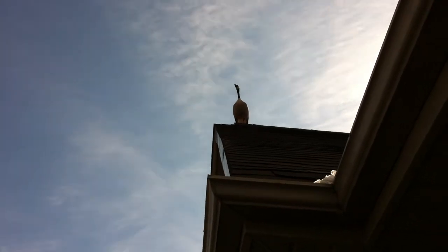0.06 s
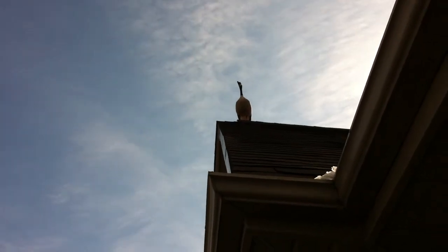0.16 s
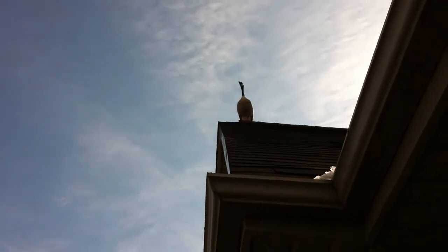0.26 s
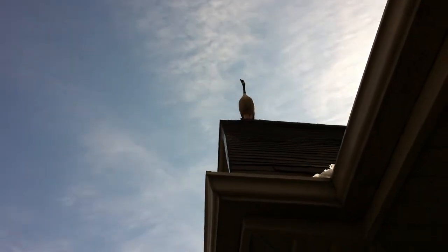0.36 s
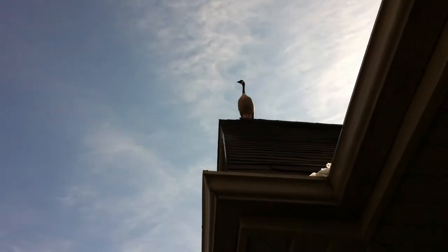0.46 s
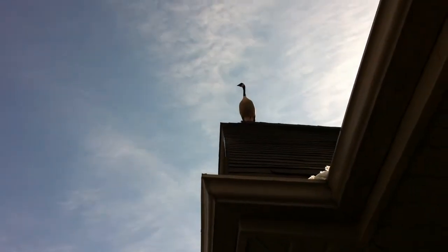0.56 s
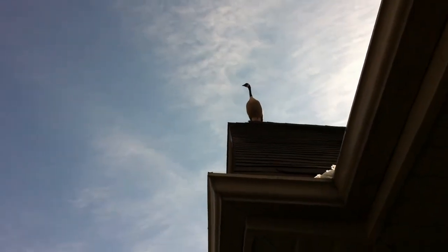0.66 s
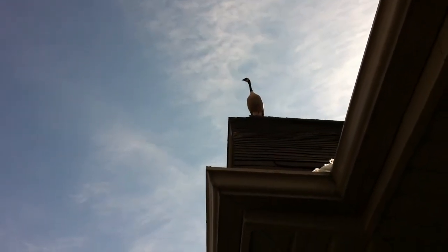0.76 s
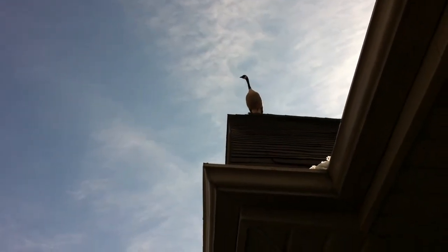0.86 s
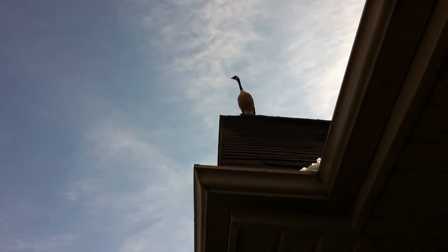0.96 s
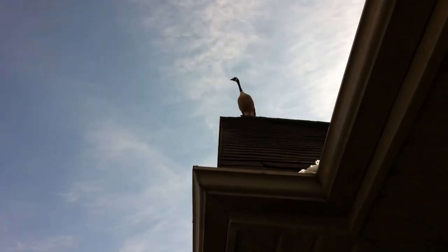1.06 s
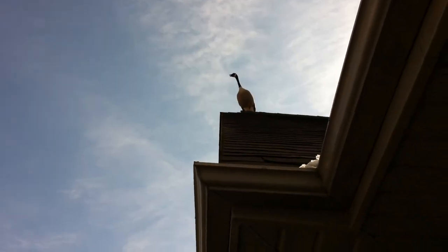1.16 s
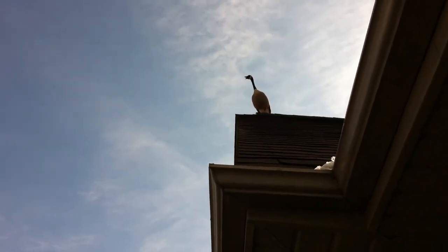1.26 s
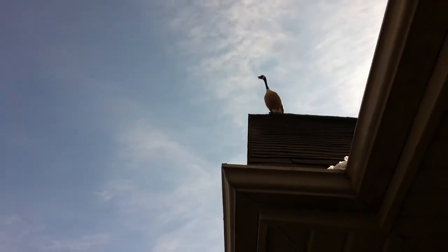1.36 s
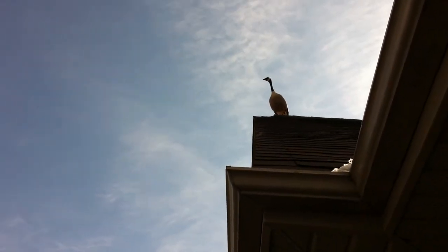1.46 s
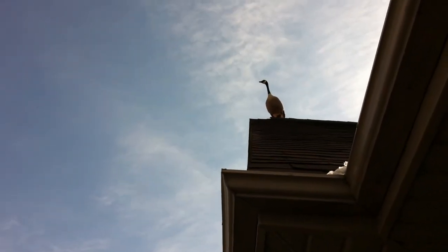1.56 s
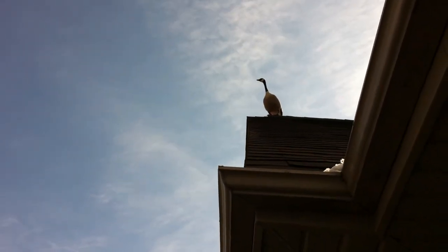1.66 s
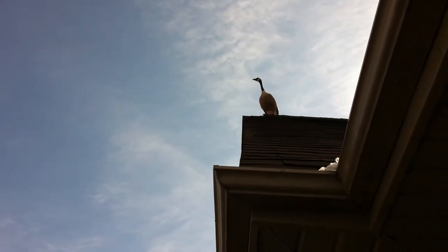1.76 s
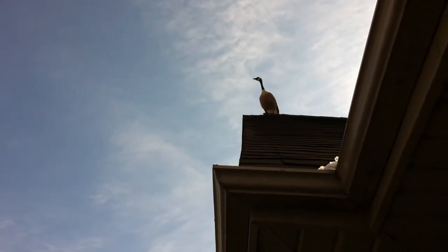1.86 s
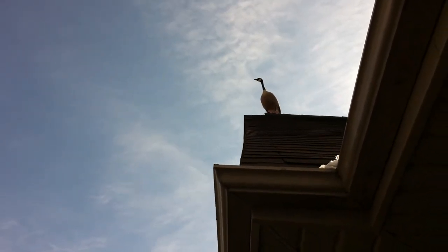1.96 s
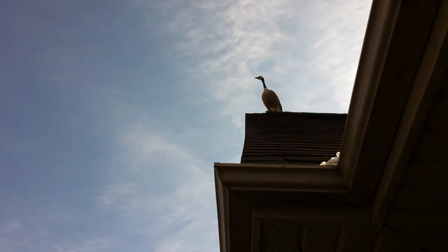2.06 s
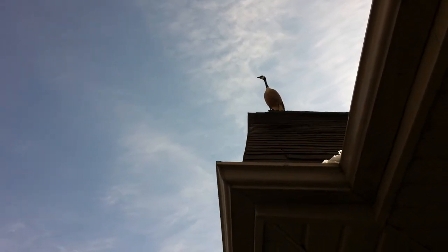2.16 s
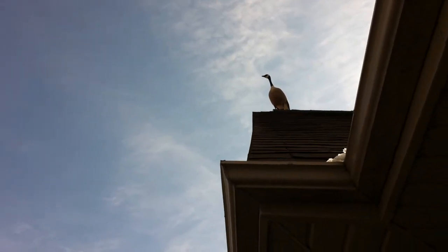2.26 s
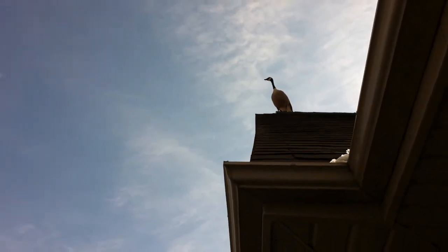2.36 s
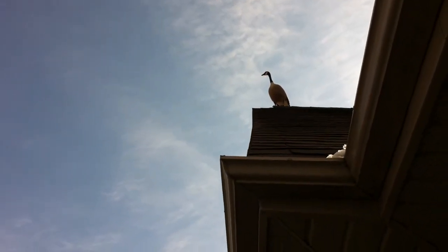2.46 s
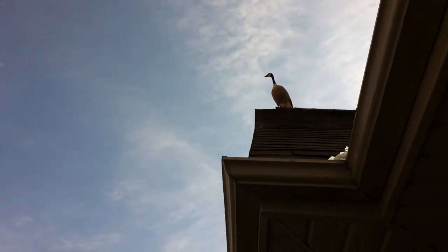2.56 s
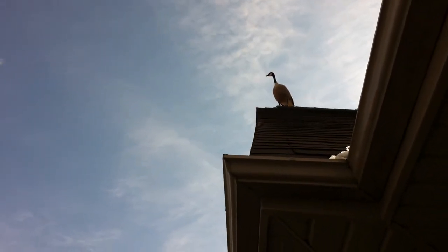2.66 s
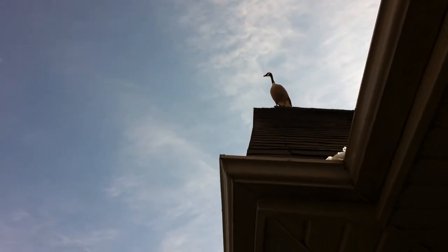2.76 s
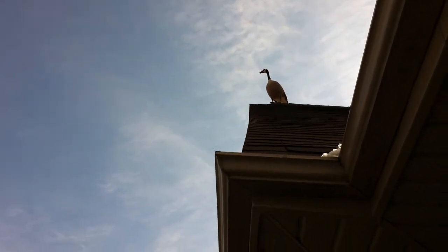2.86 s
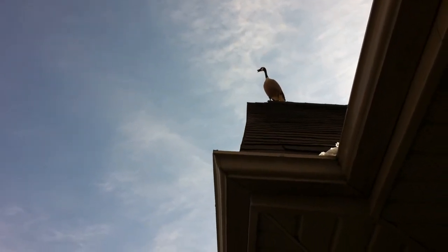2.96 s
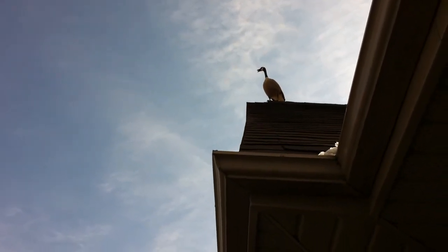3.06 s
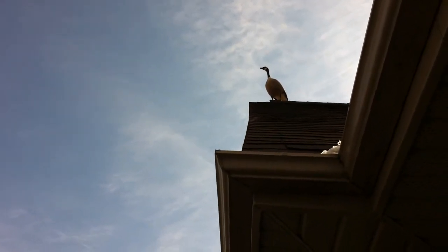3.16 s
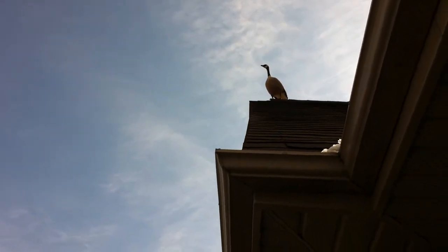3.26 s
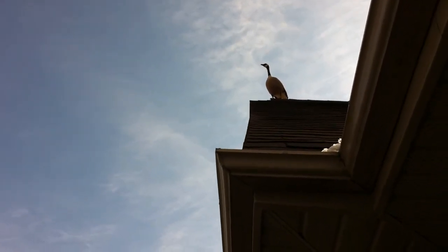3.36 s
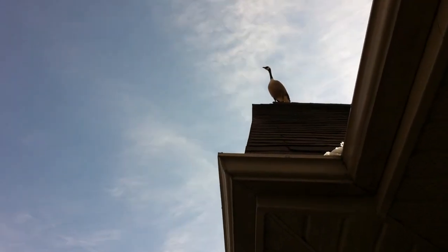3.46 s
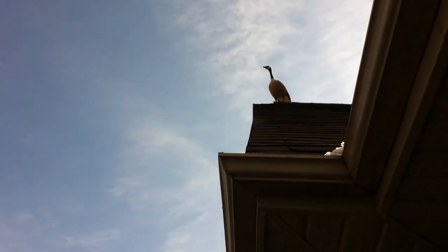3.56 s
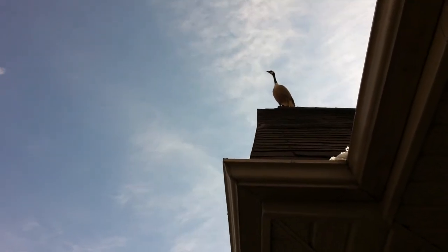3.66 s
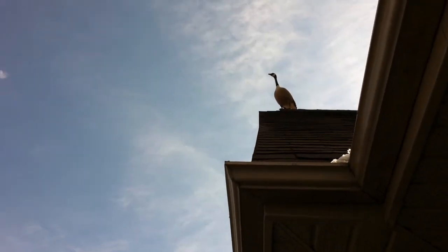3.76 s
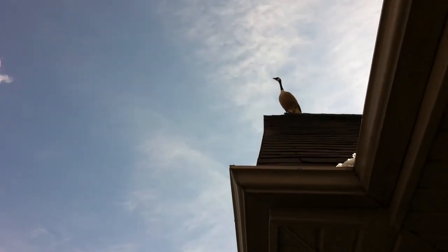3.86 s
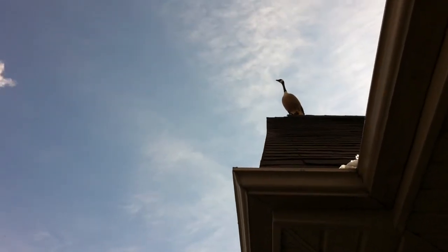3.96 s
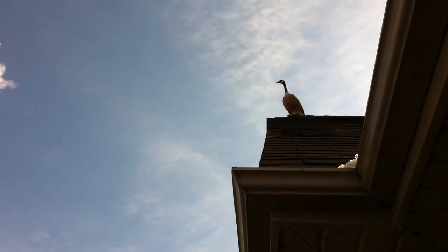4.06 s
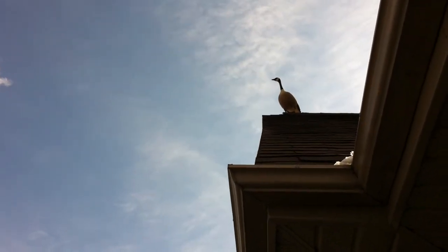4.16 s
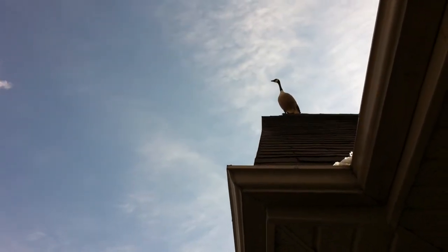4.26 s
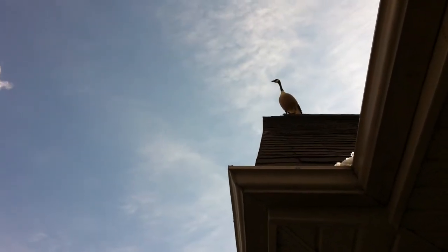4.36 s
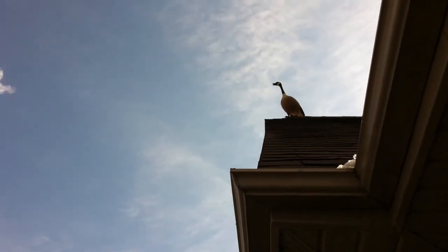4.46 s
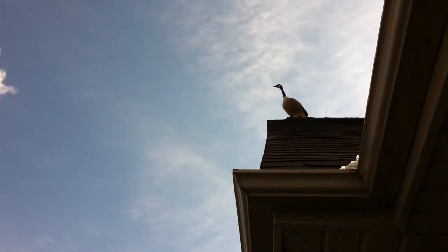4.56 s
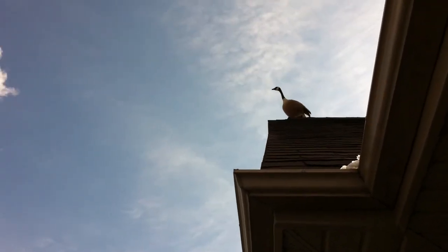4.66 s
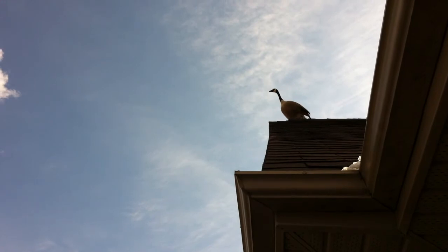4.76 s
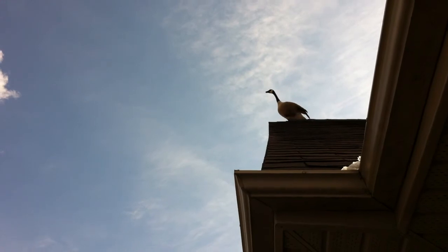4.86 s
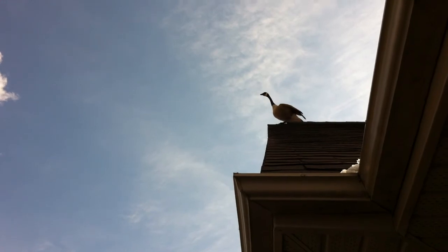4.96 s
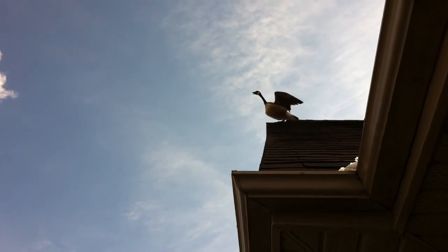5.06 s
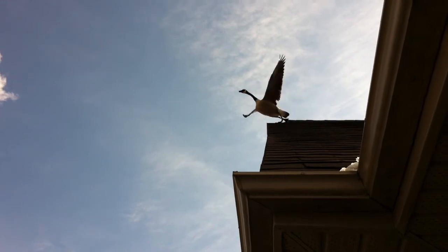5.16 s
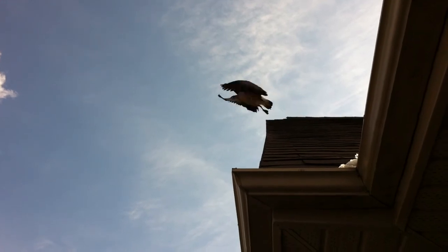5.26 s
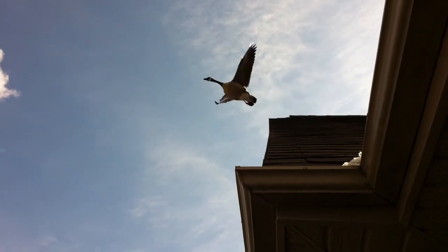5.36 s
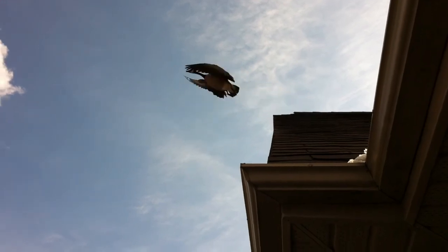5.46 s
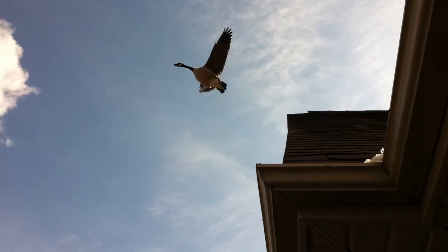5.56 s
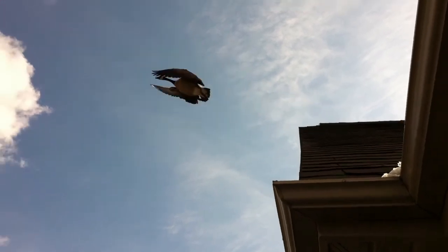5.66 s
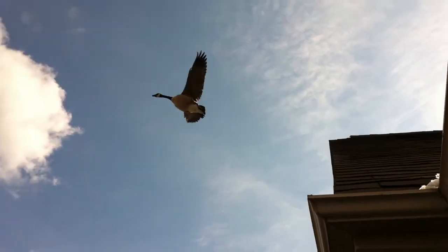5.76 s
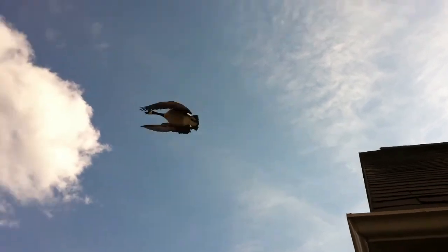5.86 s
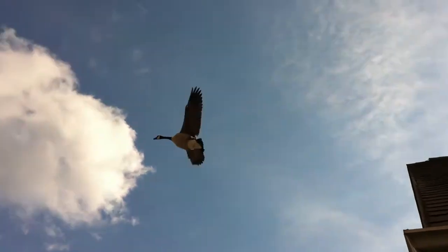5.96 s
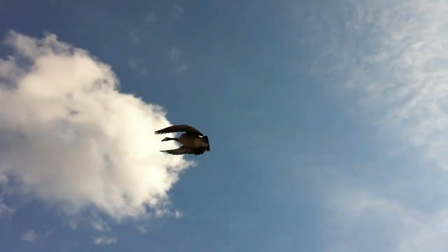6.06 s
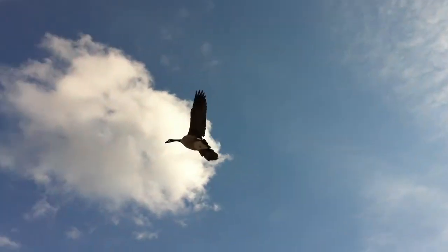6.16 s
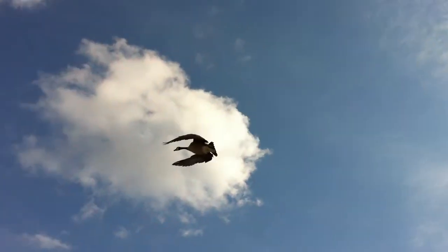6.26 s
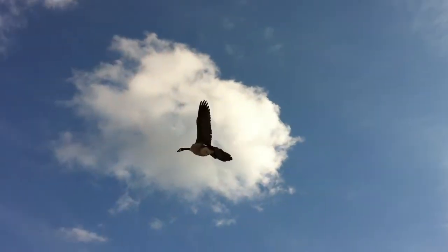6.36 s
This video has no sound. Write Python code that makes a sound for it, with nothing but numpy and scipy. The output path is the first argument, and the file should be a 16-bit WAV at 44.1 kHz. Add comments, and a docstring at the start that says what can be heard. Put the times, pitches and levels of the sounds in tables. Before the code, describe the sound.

A goose on a rooftop gives three loud, well-spaced honks, each a low grunt cracking into a short high yelp. The calls then come quickly as it takes off with a brief swish of feathers, and it keeps honking in flight, some calls clear and some hoarse. Heard from the yard below, the honks echo lightly off nearby houses over faint wind and distant traffic.

```python
"""A yard among houses, in a haze of wind and distant traffic; a small bird pipes two faint notes.
A goose on the roof ridge gives six honks, each a low rising grunt that cracks into a short high yelp.
It takes off with a rustle of feathers and calls four more times on the wing, its neck stretched out.
Its voice is a train of membrane pulses ringing a long windpipe; near walls and far houses echo it."""
import sys
import numpy as np
from scipy import signal
from scipy.fft import rfft, irfft
from scipy.io import wavfile
from scipy.ndimage import uniform_filter1d

SR = 44100
rng = np.random.default_rng(int(sys.argv[2]) if len(sys.argv) > 2 else 0)


def to_wav(s):
    """Save 16-bit WAV."""
    ch = np.atleast_2d(s).T  # columns
    pcm = np.round(np.clip(ch, -1, 1) * 32767)  # PCM
    wavfile.write(sys.argv[1], SR, pcm.astype(np.int16))


N = 282681
T = np.arange(N) / SR
FILTER_HZ = np.maximum(np.fft.rfftfreq(4096, 1 / SR), 1)


def from_db(db):
    return 10 ** (np.asarray(db) / 20)


def rms_one(x):
    return x / np.sqrt(np.mean(x ** 2) + 1e-20)


def ramp(x):
    return np.clip(x, 0, 1)


def during(start, end):
    """The samples between two times, and their times."""
    span = (T > start) & (T < end)
    return span, T[span]


def cut(x, hz, kind, order=4):
    return signal.sosfilt(signal.butter(order, hz, kind, fs=SR, output="sos"), x)


def causal(x, gain):
    """Minimum-phase filter with the given gain at FILTER_HZ: it rings after a pulse, never before."""
    cepstrum = irfft(np.log(gain + 1e-6))
    half = len(cepstrum) // 2
    cepstrum[1:half] *= 2
    cepstrum[half + 1:] = 0
    return signal.fftconvolve(x, irfft(np.exp(rfft(cepstrum))))[:len(x)]


def eq(x, points):
    """Draw an EQ curve through points of f/Hz, gain/dB."""
    hz, db = np.transpose(points)
    return causal(x, from_db(np.interp(np.log(FILTER_HZ), np.log(hz), db)))


def resonate(x, modes):
    """Ring steep-sided resonances and roll off the bass, which a pipe does not radiate."""
    power = sum(from_db(db) ** 2 / (1 + ((FILTER_HZ - hz) / (.78 * width)) ** 2) ** 2
                for hz, width, db in modes)
    return cut(causal(x, np.sqrt(power)), 477, "high", order=2)


def leveller(x, size=330):
    """Hold the short-term rms at 1, keeping the shape of each cycle."""
    power = uniform_filter1d(uniform_filter1d(x ** 2, size), size)
    return x / np.sqrt(np.maximum(power, 0) + 1e-12)


# Tone of the outdoor bed: f/Hz, gain/dB
HAZE_EQ = [(15, -67), (25, -34), (43, -22.5), (68, -28), (127, -6.5), (223, -2.5), (256, -5.5), (463, -4.5),
           (545, -3), (754, 6), (1230, 3), (1560, 0.5), (3620, -29.5), (14800, -42.5), (16000, -56.5)]
# Fader moves on its three bands: t/s, rumble/dB, rush/dB, hiss/dB
HAZE_FADERS = [(0, -57.5, -57, -75), (2.8, -57.5, -56.5, -73), (3.9, -56, -55, -72.5),
               (4.6, -52.5, -50, -69.5), (5.3, -48.5, -47.5, -60.5), (5.9, -48.5, -48, -59.5),
               (6.41, -47.5, -42, -60.5)]
def haze(still_hiss_db):
    """Far traffic and wind swell over a thin steady hiss.
    At the very end the middle band lifts, standing in for the last call's echo."""
    air = eq(rng.standard_normal(N), HAZE_EQ)
    rumble = cut(air, 480, "low")
    rush = cut(air, [400, 2600], "band")
    hiss = cut(cut(air, 3693, "high"), 11000, "low", order=1)
    times, *faders = np.transpose(HAZE_FADERS)
    bed = sum(from_db(np.interp(T, times, db)) * rms_one(band)
              for band, db in zip((rumble, rush, hiss), faders))
    return bed + from_db(still_hiss_db) * rng.standard_normal(N)


# The small bird's notes: t/s, length/s, f/Hz, level/dB
PIPING = [(2.44, 0.047, 2930, -70.5), (2.5, 0.128, 3070, -71)]
def small_bird(slide_hz=232, slide_s=.014, sag_db_per_s=53.5):
    """A faint wavering whistle; each note slides down onto its pitch."""
    out = np.zeros(N)
    waver = 1 + .0074 * rms_one(cut(rng.standard_normal(N), 77, "low", order=2))
    for start, length, hz, level_db in PIPING:
        span, t = during(start, start + length)
        age = t - start
        pitch = (hz + slide_hz * np.exp(-age / slide_s)) * waver[span]
        fade = np.sqrt(2 * ramp(np.sin(np.pi * age / length)))
        tone = np.sin(2 * np.pi * np.cumsum(pitch) / SR)
        out[span] += from_db(level_db - sag_db_per_s * age) * fade * tone
    return out


# EQ on the echo return: f/Hz, gain/dB
RETURN_EQ = [(200, -2.5), (750, 1.5), (1100, 1.5), (1550, -1.5), (2500, 4.5), (4600, -3.5), (8000, 4),
             (16000, -62.5)]
def street(x, walls, yard_db, yard_t60, houses_db, houses_s, houses_spread_s, tail_db, tail_t60):
    """Near walls slap back, the yard scatters, far houses return a blurred echo; a narrow tail rings."""
    t = T[:int(1.5 * SR)]
    noise = rng.standard_normal((3, len(t)))
    yard = noise[0] * from_db(-60 * t / yard_t60) * (t > .008)
    houses = noise[1] * np.exp(-.5 * ((t - houses_s) / houses_spread_s) ** 2)
    tail = noise[2] * from_db(-60 * t / tail_t60) * np.minimum(t / .05, 1)
    yard, houses, tail = (e / np.linalg.norm(e) for e in (yard, houses, tail))
    impulse = from_db(yard_db) * yard + from_db(houses_db) * cut(houses, 2100, "low", order=1)
    impulse += from_db(tail_db) * resonate(tail, [(800, 59, -6), (1470, 223, 2)])
    for delay, db in walls:
        impulse[int(delay * SR)] += from_db(db)
    return eq(signal.fftconvolve(x, impulse)[:N], RETURN_EQ)


# Slapback off near walls, from the roof and from the air: delay/s, gain/dB
ROOF_SLAPS = [(.0092, -12.5), (0.0285, -17.5), (.044, -31), (.068, -31)]
FLIGHT_SLAPS = [(0.0122, -15), (0.032, -18), (.043, -42.5), (.07, -22)]
def echoes(perched, flying):
    """The houses answer each of the goose's two positions with its own reflections."""
    from_roof = street(perched, ROOF_SLAPS, yard_db=-9.5, yard_t60=.23, houses_db=-22, houses_s=.254,
                       houses_spread_s=.026, tail_db=-23, tail_t60=5.06)
    from_air = street(flying, FLIGHT_SLAPS, yard_db=-6, yard_t60=.12, houses_db=-26, houses_s=.283,
                      houses_spread_s=.022, tail_db=-18, tail_t60=4.9)
    return from_roof + from_air


# Tone of brushing feathers: f/Hz, gain/dB
FEATHER_EQ = [(200, -2), (1000, -4), (2800, -17), (4500, 2), (6500, -5.5), (8500, -3), (13000, -10),
              (16000, -20)]
# Wing swishes at take-off: t/s, level/dB, half width/s
SWISHES = [(5.147, -102, 0.0039), (5.185, -54, 0.0022), (5.222, -52.5, 0.0042), (5.281, -38, 0.00256),
           (5.364, -46.5, 0.0063)]
def feathers():
    """Short bright swishes as the wings open and beat."""
    strokes = sum(from_db(db) * np.exp(-.5 * ((T - s) / width) ** 2) for s, db, width in SWISHES)
    return strokes * rms_one(eq(rng.standard_normal(N), FEATHER_EQ))


def syrinx(pitch, rough, jitter, shimmer_db, rasp, flutter, rasp_floor=.26, half_taps=8):
    """One sharp pulse per closing of the membranes; roughness upsets timing and strength and adds rasp."""
    n = len(pitch)
    tremble = rms_one(cut(rng.standard_normal(n), [40, 160], "band", order=2))
    cycles = np.cumsum(pitch * (1 + flutter * tremble)) / SR
    closings = np.interp(np.arange(1, int(cycles[-1]) + 1), cycles, np.arange(n))
    chance = rng.uniform(-1, 1, (len(closings), 2))
    unrest = rough[closings.astype(int)]
    closings += chance[:, 0] * unrest * jitter * SR / pitch[closings.astype(int)]
    strength = from_db(shimmer_db * unrest * chance[:, 1])
    # band-limited clicks can land between samples
    taps = closings.astype(int)[:, None] + np.arange(-half_taps, half_taps + 1)
    offset = taps - closings[:, None]
    click = np.sinc(offset) * np.cos(np.pi / 2 * offset / (half_taps + 1)) ** 2
    pulses = np.zeros(n)
    np.add.at(pulses, np.clip(taps, 0, n - 1), click * strength[:, None])
    puffs = np.cos(np.pi * cycles) ** 4 * rng.standard_normal(n)
    breath = np.sqrt(pitch / SR) * cut(puffs, 1460, "high", order=1)
    return pulses + rasp * (rough + rasp_floor) * breath, cycles


def windpipe_scatter(x):
    """Short waves bounce about in the windpipe, which smears each pulse over a few milliseconds."""
    for lag in (23, 41):   # all-pass delays in samples
        loop = np.r_[1, np.zeros(lag - 1), -.5]
        x = signal.lfilter(loop[::-1], loop, x)
    return x


def call(t, pitch, level_db, treble_db, rough, throat, edge_db, attack_s, release_s, yelp=0, **grit):
    """Pulses ring the throat; a soft push keeps the treble near 4-6 kHz, a hard one opens it wide."""
    source, cycles = syrinx(pitch, ramp(rough * np.ones(len(t))), **grit)
    voice = resonate(source, throat)
    body = leveller(cut(voice, 2600, "low"))
    treble = leveller(windpipe_scatter(cut(voice, 2420, "high")), size=260)
    bite = from_db(np.clip(edge_db + .9 * (level_db + treble_db + 36), -22, 1))
    mellow = signal.sosfiltfilt(signal.butter(2, [3850, 6000], "band", fs=SR, output="sos"), treble)
    treble = mellow + bite * (treble - mellow)
    if yelp:   # the closing bill keeps its resonance on the falling sixth partial
        sixth = np.exp(6 * 2j * np.pi * cycles)
        in_step = np.exp(1j * np.angle(np.vdot(sixth, treble)))
        treble = np.sqrt(1 - yelp) * treble + np.sqrt(2 * yelp) * (in_step * sixth).real
    fade = ramp(np.minimum((t - t[0]) / attack_s, (t[-1] - t) / release_s))
    # faded twice, the upper partials come last and go first
    return fade * from_db(level_db) * (body + fade * from_db(treble_db) * treble)


def slack(t, start, length, crest=.51, half_width_s=.044):
    """In flight the push of air is one arch: 0 at its crest, towards 1 on either side."""
    return 1 - np.exp(-((t - start - crest * length) / half_width_s) ** 2)


# Formants of the stretched windpipe and the bill: f/Hz, width/Hz, gain/dB
FLIGHT_FORMANTS = [(594.5, 120, -5), (820, 140, 1.5), (1177.8, 59, 9), (1415, 47, 6), (1662, 170, 1.5),
                   (2270, 97, -16.5), (3150, 490, -16.5), (3890, 300, -8.5), (4355, 300, -2.5),
                   (4770, 480, -8), (5470, 814, -12.5), (8030, 2800, -21.5), (10650, 2400, -29)]
def wing_call(t, start, length, pitch, level_db, treble_db, treble_lag_s=.0072, **voicing):
    """The push of air lifts the level and, a moment later, the brightness."""
    dip_db = 10 * slack(t, start, length)
    dulling_db = 23.5 * slack(t - treble_lag_s, start, length)
    return call(t, pitch, level_db - dip_db, treble_db - dulling_db,
                throat=FLIGHT_FORMANTS, edge_db=2, **voicing)


# Hoarse calls in flight: t/s, length/s, first f/Hz, second f/Hz, level/dB, relative treble/dB
CROAK_CUES = [(6.02, .094, 212.7, 287.5, -25.5, -10.5), (6.271, 0.0336, 278.8, 297.3, -26.5, -32)]
def croak(start, length, first_hz, second_hz, level_db, treble_db, step_s=.0127, fall_hz_per_s=517):
    """The rough low register on the wing: the pitch steps up midway, then slides down."""
    out = np.zeros(N)
    span, t = during(start, start + length)
    since_step = t - start - length / 2
    pitch = first_hz + (second_hz - first_hz) * ramp(1 + since_step / step_s)
    pitch -= fall_hz_per_s * np.maximum(since_step, 0)
    out[span] = wing_call(t, start, length, pitch, level_db, treble_db, attack_s=.0063, release_s=.015,
                          rough=.33, jitter=.049, shimmer_db=21.5, rasp=.42, flutter=.0023)
    return out


# Clear calls in flight: t/s, length/s, top f/Hz, level/dB, relative treble/dB
BLARE_CUES = [(5.429, 0.11, 613.6, -19.5, -9.5), (5.674, 0.1012, 610, -20.5, -13.5),
              (6.276, .080, 618, -20.5, -12.5)]
def blare(start, length, hz, level_db, treble_db, bend=.135):
    """A clear call on the wing, its pitch rising and falling with the push."""
    out = np.zeros(N)
    span, t = during(start, start + length)
    pitch = hz * (1 - bend * slack(t, start, length))
    out[span] = wing_call(t, start, length, pitch, level_db, treble_db, attack_s=.00684, release_s=.024,
                          rough=.05, jitter=.1, shimmer_db=12, rasp=1, flutter=.008)
    return out


# Formants of windpipe and bill in the grunt: f/Hz, width/Hz, gain/dB
GRUNT_FORMANTS = [(459, 119, -2), (744, 165, -4.5), (951, 65.4, -0.5), (1106, 126, 1), (1305, 89.3, 9),
                  (1535, 72, 6.5), (1825.5, 187, -10), (3030, 550, -29.5), (4220, 590, -16),
                  (4570, 530, -13.5), (5400, 980, -23), (7000, 720, -20.5), (11650, 2800, -30.5)]
def grunt(crack, lead_s, hz, jump, lead_db, peak_db, overhang_s):
    """Low register: a soft rising growl that surges louder, brighter and rougher into the crack."""
    rise_hz_per_s, jump_lead_s, jump_glide_s = 185, .034, .01183
    surge_s, jolt_s = .03754, .0035
    out = np.zeros(N)
    span, t = during(crack - lead_s, crack + overhang_s)
    held_back_db = 24 * ramp((crack - t) / lead_s) ** 2.7
    surge_age = t - crack + surge_s
    # a fifth of the surge comes as a jolt, as the membranes start to slap
    surge = .2 * ramp(surge_age / jolt_s) + .8 * ramp(surge_age / surge_s)
    pitch = hz + rise_hz_per_s * (t - crack)
    pitch *= jump ** ramp((t - crack + jump_lead_s) / jump_glide_s)
    level_db = lead_db - held_back_db + surge * (peak_db - lead_db)
    treble_db = -23.5 + .6 * held_back_db + 7.5 * surge   # the buzz swells less than the body
    rough = .172 + .388 * np.sqrt(surge)
    out[span] = call(t, pitch, level_db, treble_db, rough, GRUNT_FORMANTS, edge_db=-2.5,
                     attack_s=.00167, release_s=.012, jitter=.077, shimmer_db=1, rasp=1, flutter=.0014)
    return out


# Formants of windpipe and bill in the honk: f/Hz, width/Hz, gain/dB
HONK_FORMANTS = [(702, 58, -0.5), (1138, 94, -2), (1290, 127, 4), (1539, 158, 4), (1760, 230, -16),
                 (2280, 330, -22), (3260, 210, -30.5), (4324, 503, -14), (4800, 900, -21.5),
                 (5120, 550, -19.5), (7300, 960, -35), (11600, 3250, -38.5)]
def honk(crack, length, hz, level_db, treble_db):
    """High register: a short yelp whose pitch and level sag ever faster as the air runs out."""
    pitch_fall, sag_db, brightest_at, clearing_s = .15, 7.5, .346, .012
    out = np.zeros(N)
    span, t = during(crack, crack + length)
    progress = (t - crack) / length
    spent = progress ** 2.1
    pitch = hz * (1 - pitch_fall * spent)
    dulling_db = 22 * (progress - brightest_at) ** 2
    rough = .17 + .43 * np.exp((crack - t) / clearing_s)   # ragged at the crack, then it clears
    out[span] = call(t, pitch, level_db - sag_db * spent, treble_db - dulling_db, rough, HONK_FORMANTS,
                     edge_db=.5, attack_s=.0097, release_s=.0086, yelp=.22,
                     jitter=.17, shimmer_db=13, rasp=.86, flutter=.004)
    return out


# Calls on the roof: crack t/s;
# grunt: lead-in/s, f/Hz, pitch jump/ratio, lead-in level/dB, peak level/dB, overhang/s;
# honk: length/s, f/Hz, level/dB, relative treble/dB
ROOF_CUES = [(0.058, 0.19, 180, 1.56, -32, -19.5, .012, .058, 788, -21, -10.5),
             (1.498, 0.22, 177.5, 1.56, -35, -22, 0.0202, .066, 787, -20.5, -11),
             (3.233, 0.26, 176.4, 1.56, -36.5, -22, 0.013, 0.067, 780, -23.5, -10),
             (4.684, 0.1887, 169.2, 1, -37.5, -23.5, 0.013, 0.057, 755.5, -24, -8),
             (5.017, .070, 174.3, 1, -29, -31, .050, 0.039, 664.4, -24, -14),
             (5.262, 0.071, 174.8, 1, -32, -31, 0.045, 0.056, 759, -22.5, -10)]
def roof_calls():
    """The perched goose's voice cracks from the low register into the high one on every call."""
    return sum(grunt(crack, *low) + honk(crack, length, hz, level_db, treble_db)
               for crack, *low, length, hz, level_db, treble_db in ROOF_CUES)


def scene():
    """Mono mix: the goose and its echoes up front, over feathers, the small bird and the haze."""
    perched = roof_calls()
    flying = sum(blare(*cue) for cue in BLARE_CUES) + sum(croak(*cue) for cue in CROAK_CUES)
    goose = perched + flying + echoes(perched, flying) + feathers()
    return (goose + small_bird() + haze(still_hiss_db=-70.5))[None]


def record(dry):
    """A steep low-pass takes off the very top."""
    return signal.sosfilt(signal.ellip(10, .2, 80, 15900, fs=SR, output="sos"), dry)


dry = scene()
out = record(dry)
to_wav(out)
```